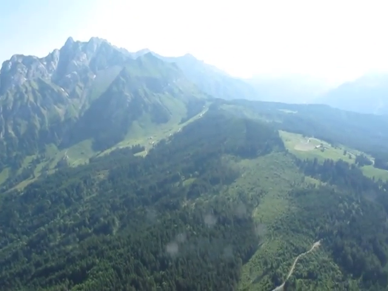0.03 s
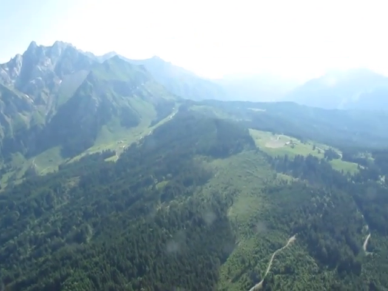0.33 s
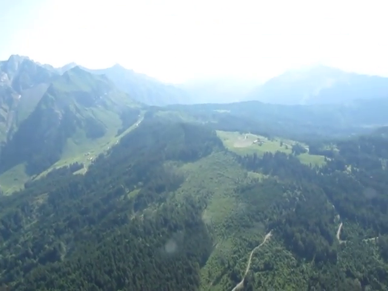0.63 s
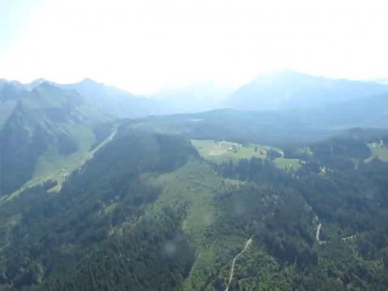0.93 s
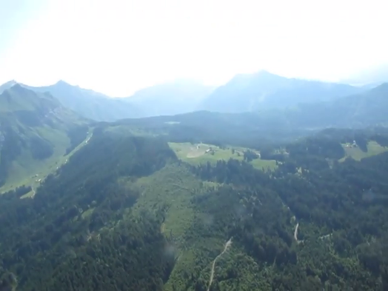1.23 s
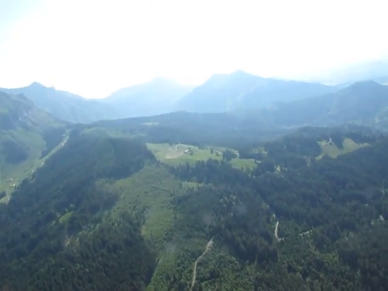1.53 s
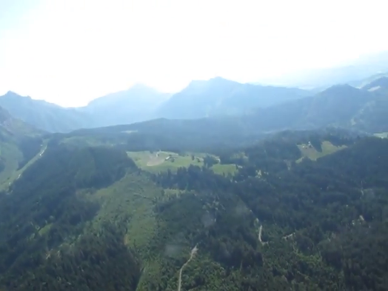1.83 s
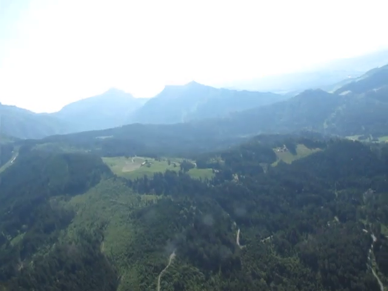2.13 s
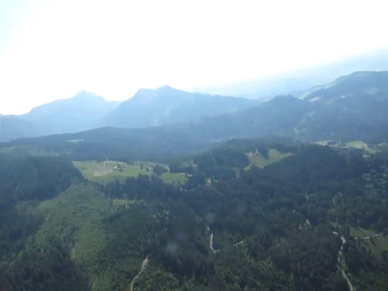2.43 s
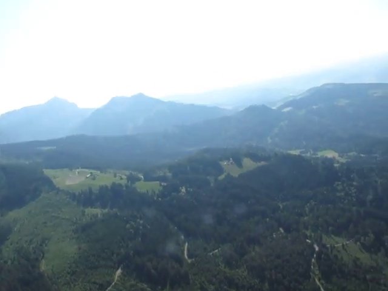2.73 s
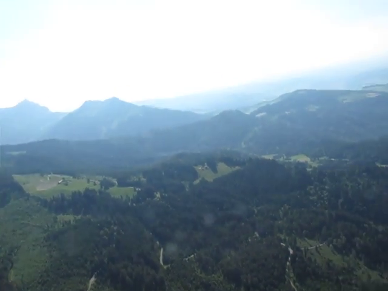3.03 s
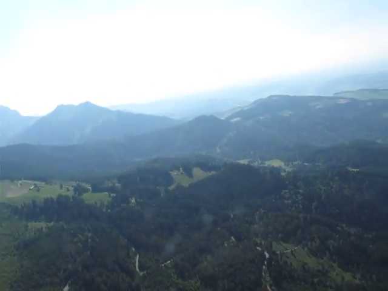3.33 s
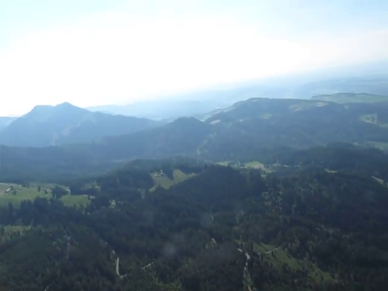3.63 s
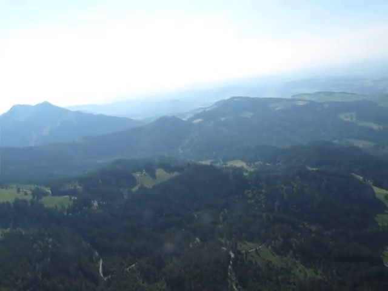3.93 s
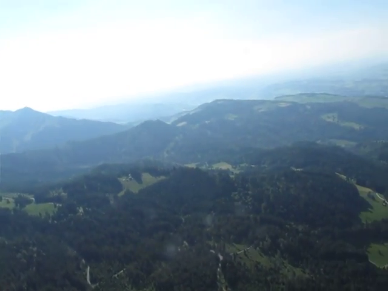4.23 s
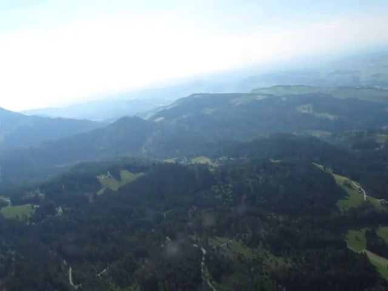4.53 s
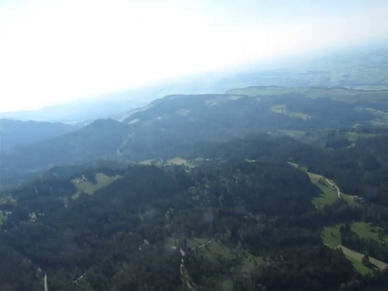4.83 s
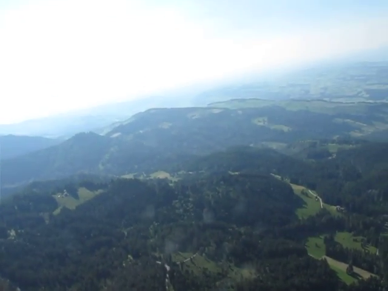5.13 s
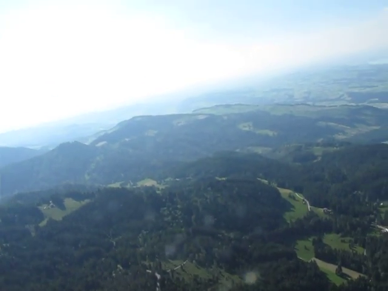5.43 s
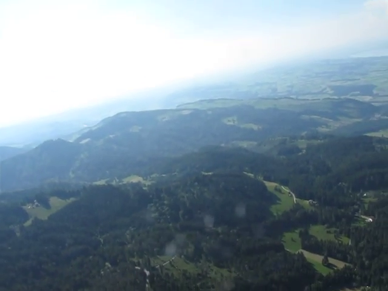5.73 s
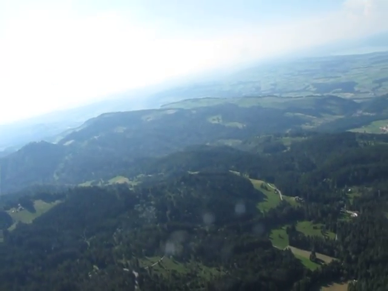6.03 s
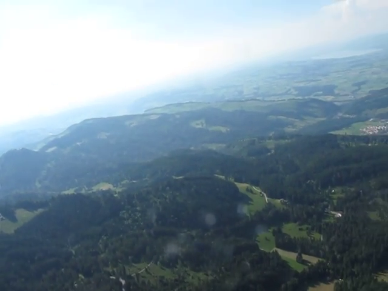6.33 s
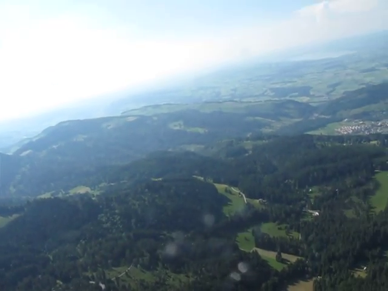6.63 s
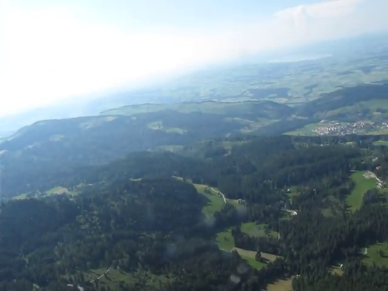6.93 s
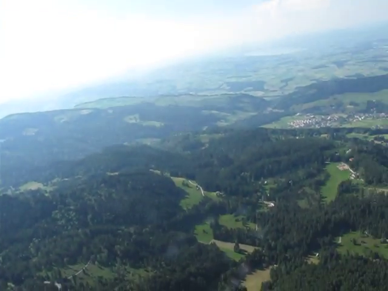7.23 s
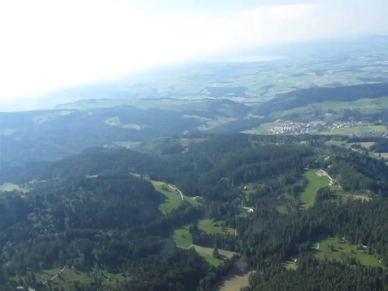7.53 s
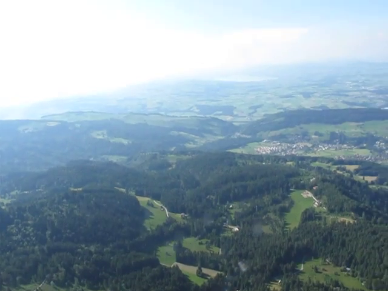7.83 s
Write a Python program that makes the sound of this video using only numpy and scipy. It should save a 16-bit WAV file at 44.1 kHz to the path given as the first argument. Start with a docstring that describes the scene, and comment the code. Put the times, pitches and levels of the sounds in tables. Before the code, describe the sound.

Strong wind roars and buffets the microphone without a break, with rasping crackle, low rumble and a fine hiss.

```python
"""Wind roars over a small camera's microphone in gliding flight, high above hills.
Large eddies buffet the port; small, fast ones tear past in spurts of a millisecond or two and add rasp
and crackle, with a rumble below and a fine hiss on top. The airflow gets rougher and smoother as the
glider turns, and the camera's limiter ducks under the strongest peaks."""
import sys
import numpy as np
from scipy.fft import rfft, irfft, next_fast_len
from scipy.io import wavfile
from scipy.ndimage import uniform_filter1d, minimum_filter1d, map_coordinates

SR = 44100
rng = np.random.default_rng(int(sys.argv[2]) if len(sys.argv) > 2 else 0)


def int16_out(signal):
    """Quantize to a 16-bit WAV file."""
    q = np.round(np.clip(np.atleast_2d(signal).T, -1, 1) * 32767)
    wavfile.write(sys.argv[1], SR, q.astype(np.int16))


N = 352359

# Roughness of the airflow, riding roar, buffet and crackle: t/s, relative level/dB
AIR_ROUGHNESS = [(0.0, -32.0), (0.15, -30.0), (0.3, -34.5), (0.5, -32.0), (1.0, -33.0), (1.2, -29.5),
                 (1.55, -32.0), (1.8, -30.0), (2.1, -36.0), (2.5, -32.0), (2.7, -35.0), (2.85, -30.5),
                 (3.0, -34.0), (3.55, -37.5), (3.7, -36.0), (3.85, -38.0), (4.5, -36.5), (5.1, -29.5),
                 (5.45, -37.0), (6.55, -40.0), (6.65, -35.0), (7.45, -33.0), (7.7, -36.5), (8.0, -38.0)]
# The hardest slaps of air on the port: t/s, peak level/dB, treble edge f/Hz
AIR_SLAPS = [(0.046, -9.0, 4600), (0.103, -9.5, 5000), (0.133, -9.0, 6000), (0.14, -7.5, 3900),
             (0.19, -9.5, 6000), (0.219, -12.5, 6000), (0.469, -3.0, 2900), (0.672, -7.5, 4200),
             (0.803, -9.0, 4600), (0.883, -5.5, 3600), (1.08, -2.0, 2800), (1.103, -4.5, 3800),
             (1.156, -8.5, 6000), (1.176, -9.5, 5000), (1.211, -6.0, 4700), (1.348, -9.0, 4300),
             (1.49, -6.5, 3500), (1.645, -8.5, 4800), (1.669, -6.5, 4600), (1.769, -10.0, 4300),
             (1.816, -5.5, 4400), (1.849, -9.5, 6000), (1.863, -4.0, 4100), (2.373, -7.5, 4900),
             (2.464, -9.5, 3500), (2.502, -11.0, 3900), (2.669, -9.0, 3900), (2.819, -8.5, 4500),
             (2.834, -7.5, 4300), (2.857, -9.0, 6000), (2.884, -6.5, 4100), (2.918, -8.5, 6000),
             (3.108, -9.0, 3000), (3.507, -13.0, 6000), (4.083, -8.0, 2900), (4.122, -12.5, 4700),
             (4.345, -7.0, 2800), (4.683, -8.0, 4000), (4.773, -7.0, 3200), (4.889, -5.5, 4900),
             (4.999, -6.0, 5200), (5.107, -6.0, 3900), (5.151, -3.5, 3300), (5.2, -7.5, 4900),
             (5.296, -4.5, 2800), (5.308, -6.5, 3600), (5.839, -9.0, 3400), (6.089, -7.0, 2800),
             (6.64, -6.5, 5900), (6.659, -10.0, 3900), (6.709, -5.5, 2800), (6.817, -4.5, 3000),
             (6.894, -9.5, 4400), (7.108, -6.5, 4400), (7.195, -5.5, 3400), (7.241, -10.5, 3000),
             (7.3, -9.0, 3800), (7.392, -5.5, 3000), (7.404, -9.0, 3400), (7.44, -5.5, 2800),
             (7.474, -4.0, 2800), (7.49, -7.0, 3000), (7.879, -3.0, 3400)]
# Tone of each wind layer and of one small eddy: f/Hz, relative level/dB
ROAR_TONE = [(150, -26), (350, -0.5), (550, 2.5), (900, 0), (1500, -3.5), (2600, -8), (4500, -15),
             (7000, -13), (10000, -9), (16000, -40)]
BUFFET_TONE = [(60, -47), (130, -4), (210, 4), (320, 4), (460, -2.5), (700, -21), (1500, -54.5)]
RUMBLE_TONE = [(10, -34), (25, -11), (45, -6), (75, 0), (120, -0.5), (180, -0.5), (400, -48.5)]
HISS_TONE = [(1000, 2), (3000, 17), (5000, 10), (7500, 1), (10000, 4), (12000, 6), (16000, -17)]
EDDY_TONE = [(150, -34), (500, 4.5), (1000, 0), (1700, -0.5), (3000, -5), (5000, -10), (7500, -10.5),
             (10000, -8), (16000, -3)]
# Fader rides for the rumble and, ahead of its trim, the hiss: t/s, level/dB
RUMBLE_FADER = [(0.0, -30), (0.85, -29.5), (1.05, -24.5), (1.25, -30), (2.2, -24.5), (2.55, -28.0),
                (3.2, -25.0), (4.75, -25), (5.15, -29.5), (5.4, -22.5), (6.35, -23), (7.05, -28),
                (7.6, -22.5), (8.0, -27.5)]
HISS_FADER = [(0.0, -50), (0.15, -47.5), (1.09, -50), (1.24, -46), (4.27, -52), (5.07, -50.5), (5.87, -54),
              (7.99, -69)]
# The microphone's treble roll-off: f/Hz, level/dB
MIC_ROLLOFF = [(10000, 0), (10500, -2.5), (11000, -8.5), (11400, -17), (11800, -30), (12300, -19),
               (13000, -17), (15800, -16)]


def roar(swirl, level_db=-20.5, mid_edge_hz=1200, push_db=1.78):
    """The body of the wind: faster air has finer eddies, so each surge is louder and brighter."""
    rough_db = roughness()
    edge_hz = mid_edge_hz * 2 ** (0.04 * rough_db + 0.24 * swirl)
    rush = moving_lowpass(noise(ROAR_TONE), edge_hz, steepness=2.04)
    drift_db = 1.1 * wobble(knots_per_s=8)
    return amp(level_db + 0.08 * rough_db + drift_db) * steadied(rush * amp(push_db * swirl))


def buffet(swirl, level_db=-20, push_db=1.8):
    """Low thumps of wind on the port, ducking as the rasp rises and fuller in smooth air."""
    thumps = steadied(noise(BUFFET_TONE) * amp(push_db * swirl))
    return amp(level_db - 0.4 * roughness()) * thumps


def slaps():
    """Accents: the hardest eddies stand out as single cracks."""
    times, peak_db, edge_hz = np.transpose(AIR_SLAPS)
    return spurts(times, peak_db, edge_hz, width_s=np.full(len(times), 0.001115), snap=4.6)


def crackle(rate_hz=110, mid_peak_db=-17, scatter_db=5.0, mid_edge_hz=2600, mid_width_s=0.00059):
    """Small eddies shed at a loose, uneven pace: denser, harder and brighter in rough air."""
    rough_db = roughness()
    shed_so_far = np.cumsum(rate_hz * np.exp(0.07 * rough_db)) / SR
    jitter, strength, tint, length = rng.random((int(shed_so_far[-1]), 4)).T
    at = np.interp(np.arange(len(jitter)) + jitter, shed_so_far, np.arange(N)).astype(int)
    force_db = 0.79 * rough_db[at] + scatter_db * (2 * strength - 1)
    edge_hz = mid_edge_hz * 2 ** (0.1 * force_db + 0.74 * (tint - .5))
    width_s = mid_width_s * 2 ** (2.5 * (length - .5))
    return spurts(at / SR, mid_peak_db + force_db, edge_hz, width_s, snap=3.2)


def rumble():
    """The low bed of the wind, slowly swelling and sinking."""
    level_db, = curves(RUMBLE_FADER)
    return amp(level_db) * steadied(noise(RUMBLE_TONE))


def hiss(swirl, trim_db=5, flutter_db=1.5, flicker_db=4.0):
    """Fine air on top: it flutters with the eddies and flickers more slowly on its own."""
    fader_db, = curves(HISS_FADER)
    air = noise(HISS_TONE) * amp(flutter_db * swirl + flicker_db * wobble(knots_per_s=32))
    return amp(fader_db + trim_db) * unit(air)


def turbulence():
    """Speed swings of the air at the port: large, medium and small eddies."""
    return unit(0.3 * wobble(knots_per_s=40) + wobble(knots_per_s=190) + 0.57 * wobble(knots_per_s=650))


def roughness():
    """How much rougher than average the airflow is, in dB."""
    rasp_db, = curves(AIR_ROUGHNESS)
    return rasp_db - rasp_db.mean()


def spurts(times, peak_db, edge_hz, width_s, snap, size=512):
    """Single eddies cross the port: each a pressure spike of strength snap in a bell-shaped puff."""
    hz = np.fft.rfftfreq(size, 1 / SR)
    offset = np.arange(size) - size // 2
    air = rng.standard_normal((len(times), size))
    air += snap * np.sign(air) * (offset == 0)  # the core of the eddy pushes or pulls
    colour = gain(EDDY_TONE, hz) / np.sqrt(1 + (hz / edge_hz[:, None]) ** 5.6)
    bell = np.exp(-.5 * (offset / SR / width_s[:, None]) ** 2)
    puffs = irfft(rfft(air) * colour) * bell
    puffs *= (amp(peak_db) / np.abs(puffs).max(axis=1))[:, None]
    places = np.clip(np.round(times * SR).astype(int)[:, None] + offset, 0, N)
    return np.bincount(places.ravel(), puffs.ravel(), N + 1)[:N]


def limiter(x, ceiling=0.68, hold=600):
    """Ducks for about hold samples at each peak over the ceiling."""
    needed = np.minimum(1, ceiling / (np.abs(x) + 1e-9))
    held = minimum_filter1d(needed, hold, origin=hold // 3)
    return x * uniform_filter1d(held, hold // 4)


def amp(db):
    """Decibels to gain."""
    return 10 ** (np.asarray(db) / 20)


def unit(x):
    """x at rms 1."""
    return x / np.sqrt(np.mean(x ** 2) + 1e-20)


def gain(points, hz):
    """Gain of an EQ curve through (f/Hz, level/dB) points on a log axis."""
    f, db = np.transpose(points)
    return amp(np.interp(np.log(hz + 1), np.log(f + 1), db))


def curves(rows):
    """One automation lane for each column after the time."""
    times, *columns = np.transpose(rows)
    return [np.interp(np.arange(N) / SR, times, column) for column in columns]


def wobble(knots_per_s):
    """A smooth random modulator of rms 1."""
    knots = rng.standard_normal(N * knots_per_s // SR + 4)
    return unit(map_coordinates(knots, [np.arange(N) * knots_per_s / SR]))


def filtered(x, response):
    """x through an EQ whose gain is response(hz)."""
    padded = next_fast_len(N + SR // 4)
    return irfft(rfft(x, padded) * response(np.fft.rfftfreq(padded, 1 / SR)), padded)[..., :N]


def noise(tone):
    """Noise of rms 1, coloured by a tone table."""
    return unit(filtered(rng.standard_normal(N), lambda hz: gain(tone, hz)))


def steadied(x, size=6000):
    """Levels x to rms 1 over stretches of size samples; faster flutter stays."""
    return x / np.sqrt(np.abs(uniform_filter1d(x ** 2, size)) + 1e-12)


def moving_lowpass(x, edge_hz, steepness):
    """A filter sweep: cross-fades low-passes an octave apart to follow edge_hz."""
    octaves = np.arange(8, 15)  # 256 Hz to 16 kHz
    place = np.clip(np.log2(edge_hz), octaves[0], octaves[-1])
    copies = filtered(x, lambda hz: 1 / np.sqrt(1 + (hz / 2.0 ** octaves[:, None]) ** (2 * steepness)))
    fades = np.maximum(1 - np.abs(place - octaves[:, None]), 0)
    return np.sum(copies * fades, axis=0)


def scene():
    """The mono wind mix: one turbulent stream moves buffet, roar and hiss together."""
    swirl = turbulence()
    return (buffet(swirl) + rumble() + roar(swirl) + hiss(swirl) + slaps() + crackle())[None]


def record(dry, top_hz=15800):
    """The camera ducks under the highest peaks and loses the top treble."""
    return filtered(limiter(dry), lambda hz: gain(MIC_ROLLOFF, hz) * (hz < top_hz))


dry = scene()
out = record(dry)
int16_out(out)
```